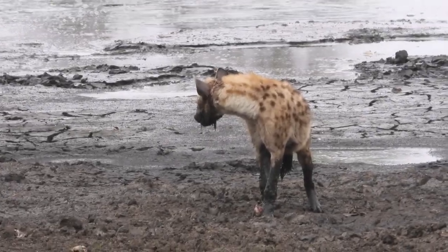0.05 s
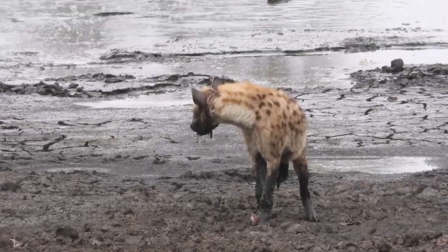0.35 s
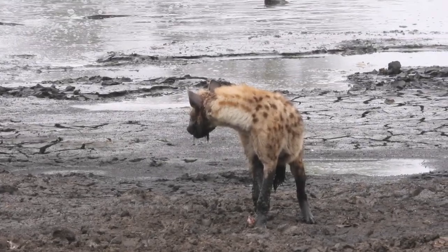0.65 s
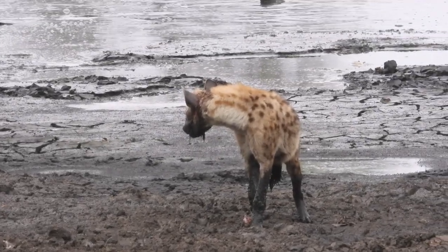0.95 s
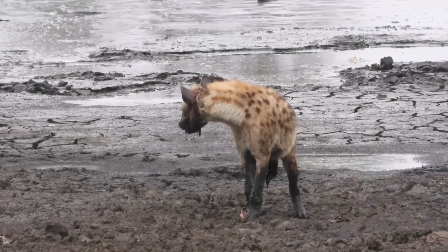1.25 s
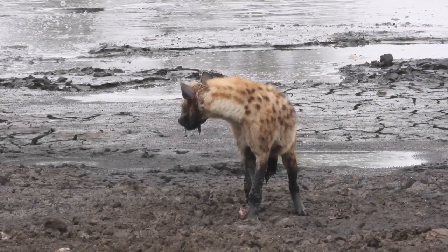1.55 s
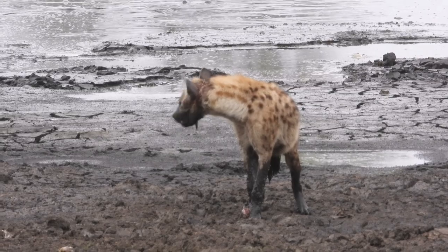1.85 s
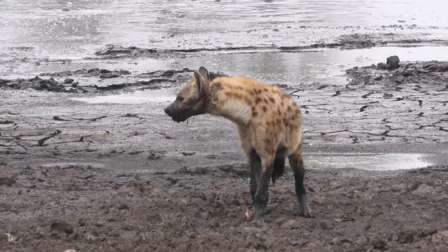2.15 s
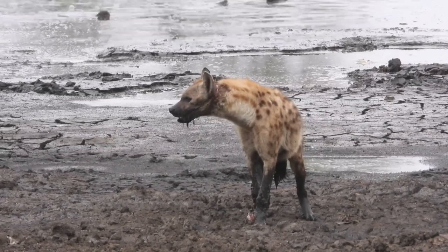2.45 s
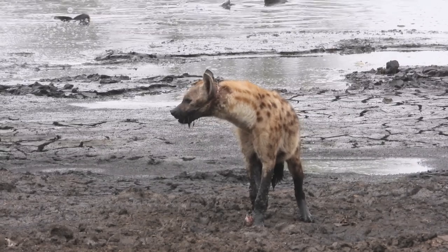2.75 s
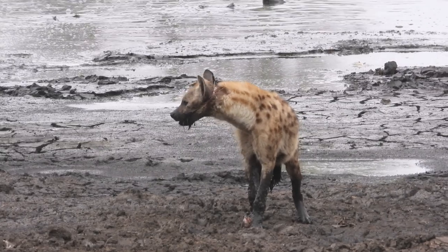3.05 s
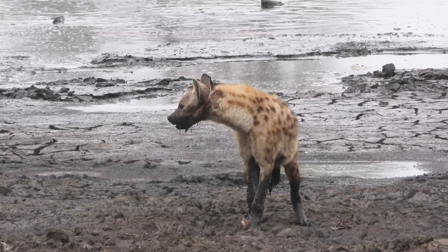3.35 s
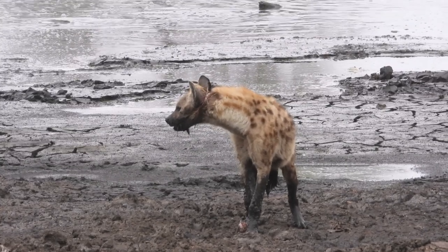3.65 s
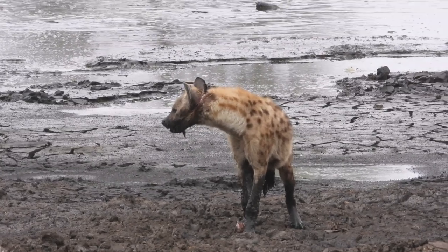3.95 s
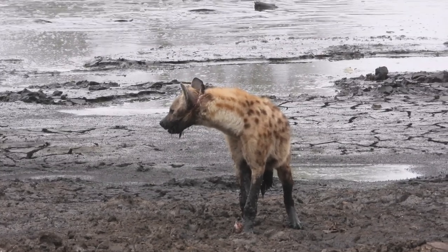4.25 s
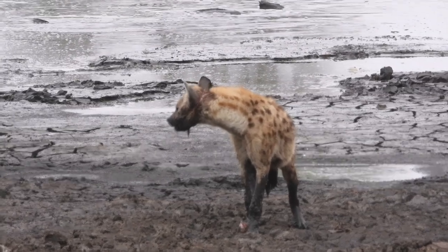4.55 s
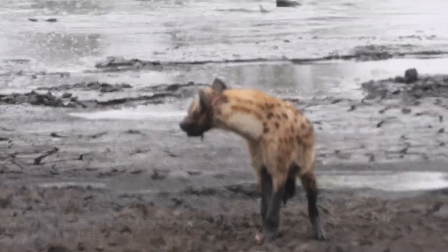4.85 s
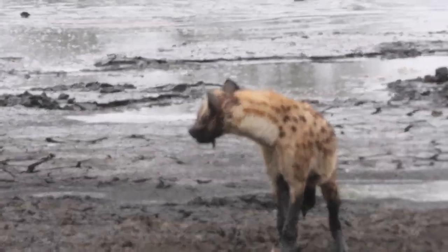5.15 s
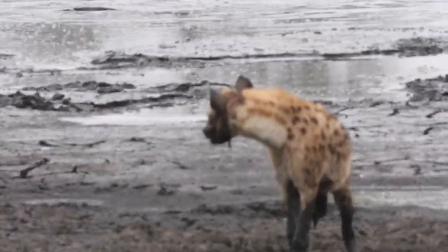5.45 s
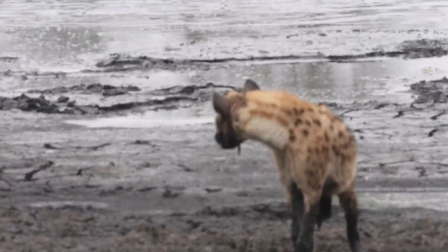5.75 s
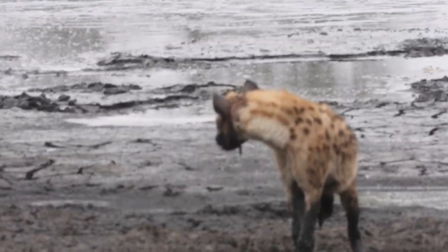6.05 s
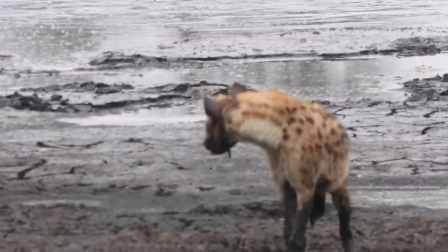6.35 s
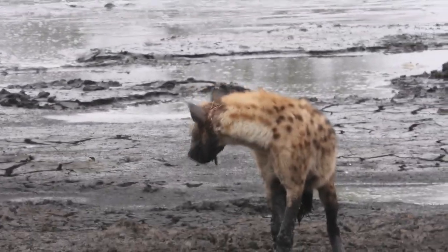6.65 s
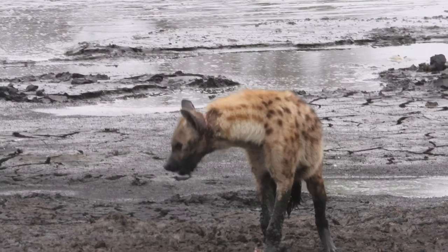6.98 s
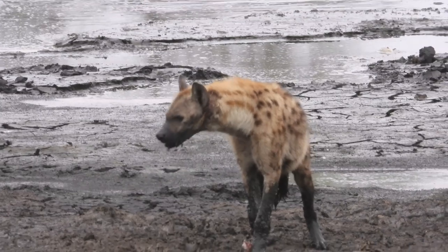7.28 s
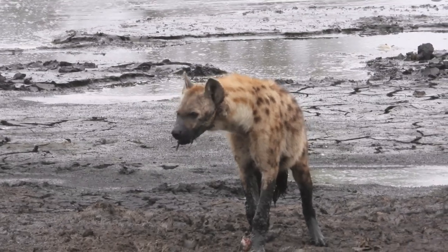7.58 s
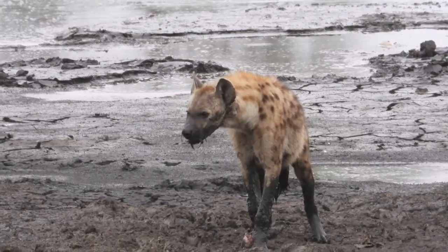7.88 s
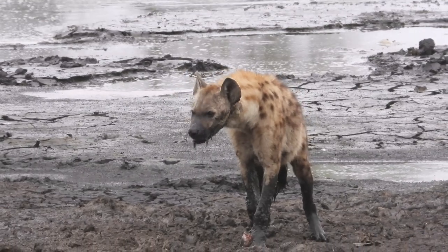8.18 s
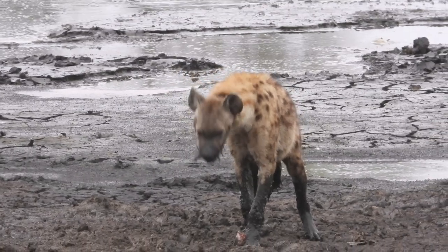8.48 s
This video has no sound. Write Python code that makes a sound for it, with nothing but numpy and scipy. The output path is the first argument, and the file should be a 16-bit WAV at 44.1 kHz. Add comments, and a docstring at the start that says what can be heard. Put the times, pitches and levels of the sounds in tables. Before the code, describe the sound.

Shrill piping notes from a scolding bird speed up and swell, pause, then end with three pips, with soft bumps and hiss nearby.

```python
"""Short piping notes quicken, swell and ease off, then three last pips: a plover-like bird scolds
beside a waterhole. Each note is a rising glide that cracks into a held, arched whistle (its "top"),
and ground and bushes scatter it back. Close by, a camera's zoom motor whirrs for a moment and its
body is bumped, over faint open air and far birds."""
import sys
import numpy as np
from scipy import signal
from scipy.fft import rfft, irfft, next_fast_len
from scipy.io import wavfile
from scipy.ndimage import uniform_filter1d, map_coordinates

SR = 44100
rng = np.random.default_rng(int(sys.argv[2]) if len(sys.argv) > 2 else 0)


def bounce(signal):
    """Save signal as a 16-bit WAV file at the path given by the first command-line argument."""
    frames = np.transpose(np.atleast_2d(signal))
    limited = np.clip(frames, -1, 1)
    pcm = np.round(limited * 32767).astype(np.int16)
    wavfile.write(sys.argv[1], SR, pcm)


N = 384552
TIME = np.arange(N) / SR

# the rasp in the bird's voice: pitch_hz, relative_db
RASP_SPECTRUM = [(1200, -28), (2500, -10), (3500, -8.5), (5500, -4.5), (7000, -9.5), (9000, -15.5),
                 (12000, -27), (15000, -50.5)]


def undb(db):
    """Turn decibels into a gain."""
    return 10 ** (np.asarray(db) / 20)


def unit(x):
    """Scale a sound to an average (rms) size of 1."""
    return x / np.sqrt(np.mean(x ** 2))


def read_db(points, hz):
    """Look up a spectrum's level at a pitch."""
    f, db = np.transpose(points)
    return np.interp(np.log(hz + 1), np.log(f), db)


def read_curve(table, at):
    """Look up a value between the rows of a two-column table."""
    return np.interp(at, *np.transpose(table))


def noise(points, n):
    """Noise of size 1 with the given spectrum."""
    size = next_fast_len(n, real=True)
    gains = undb(read_db(points, np.fft.rfftfreq(size, 1 / SR)))
    return unit(irfft(rfft(rng.standard_normal(size)) * gains, size)[:n])


def resonance(hz, width, n):
    """Noise of size 1 ringing around one pitch."""
    return unit(signal.lfilter(*signal.iirpeak(hz, hz / width, fs=SR), rng.standard_normal(n)))


def walk(rate, n):
    """A smooth random wobble of size near 1."""
    k = max(int(SR / rate), 2)
    jumps = np.repeat(rng.standard_normal(n // k + 1), k)
    return 1.967 * uniform_filter1d(uniform_filter1d(jumps, k), k)[:n]


def step(t, at, width):
    """A smooth switch from 0 to 1."""
    return .5 + .5 * np.tanh((t - at) / width)


def bump(t, at, width):
    """A smooth swell of height 1 around a moment."""
    return np.exp(-((t - at) / width) ** 2)


def phase_of(hz):
    """The running angle of a wave whose pitch changes."""
    return 2 * np.pi * np.cumsum(hz) / SR


def add(out, x, at, pan_db=0):
    """Mix a sound in at a time; pan_db is left minus right."""
    i = int(at * SR)
    x = x[..., :N - i]
    out[:, i:i + x.shape[-1]] += x * undb(np.array([[pan_db], [-pan_db]]) / 2)


def patchy(x, depth_db, size=2048):
    """Let each narrow band of pitch swell and fade on its own."""
    bands = signal.stft(x, nperseg=size)[2]
    swell = uniform_filter1d(rng.standard_normal(bands.shape[1:]), size=4, axis=0)
    swell = unit(uniform_filter1d(swell, size=4, axis=1))
    return signal.istft(bands * undb(depth_db * swell), nperseg=size)[1][:, :N]


def open_air(air_db=-61.5, hiss_db=4.5, drift_share=0.44, flicker_db=2, wide_hz=2200):
    """A distant din that swells in patches, alike at both ears in the bass, under smooth hiss."""
    # the air's noise: pitch_hz, relative_db
    spectrum = [(15, -100), (25, -44), (147, -11), (193, -5), (300, -3.5), (430, -2.5), (560, -8),
                (824, -4), (1230, -9), (2060, -10), (2700, -18.5), (3600, -16.5), (12100, -38.5),
                (15400, -66)]
    # the background's level over time, swelling near 1.2 s and dipping near 2.7 s; only drift_share of it is
    # used: time_s, relative_db
    loudness = [(0.0, -57.5), (1.2, -54), (2.7, -63.5), (5.3, -55.5), (7.8, -58.5)]
    # faint hums in the din: pitch_hz, width_hz, level_db
    hum_bands = [(185.3, 28, -71.5), (821, 26, -69), (2077, 36, -71.5)]
    times, levels = np.transpose(loudness)
    swell_db = drift_share * np.interp(TIME, times, levels - np.median(levels))
    spread = np.clip(np.sqrt(np.fft.rfftfreq(N, 1 / SR) / wide_hz), .4, 1)
    middle = noise(spectrum, N)
    side = irfft(rfft(noise(spectrum, N)) * spread, N)
    air = undb(air_db) * (middle + side * np.array([[1], [-1]]))
    low = signal.sosfiltfilt(signal.butter(2, 2500, fs=SR, output="sos"), air)
    hums = sum(undb(db + flicker_db * walk(12, N)) * resonance(hz, width, N)
               for hz, width, db in hum_bands)
    hums = signal.sosfilt(signal.butter(2, [140, 3000], "bandpass", fs=SR, output="sos"), hums)
    return undb(hiss_db) * (air - low) + undb(swell_db) * patchy(low + hums, depth_db=2.8)


def slur(length, from_hz, to_hz, flutter_db, waver=0.028):
    """One thin sliding call, blurred by distance."""
    n = int(length * SR)
    hz = np.linspace(from_hz, to_hz, n) * (1 + waver * walk(500, n))
    tone = unit(np.sin(phase_of(hz)) * signal.windows.tukey(n, .5))
    return undb(flutter_db * walk(122, n)) * tone


def far_birds(trill_start_s=7.72, trill_gap_s=.018):
    """Lone far calls, then a trill of falling ticks that swell into one longer slur."""
    # whistles and low hoots: start_s, length_s, from_hz, to_hz, level_db
    calls = [(.165, .13, 2900, 2420, -60), (.37, .1, 2340, 2260, -66), (.575, .13, 3060, 2830, -66),
             (8.0, .09, 3050, 2800, -71), (.06, .16, 178, 182, -64), (1.16, .07, 698, 720, -61)]
    out = np.zeros((2, N))
    for start, length, from_hz, to_hz, db in calls:
        add(out, undb(db) * slur(length, from_hz, to_hz, flutter_db=3.5), start)
    for k, length in enumerate([.0099] * 4 + [.0325]):
        tick = slur(length, from_hz=5000, to_hz=4370, flutter_db=-1)
        add(out, undb(-67.5 + 2 * k) * tick, trill_start_s + k * trill_gap_s)
    return out


def zoom_motor(on_s=4.8, off_s=5.545, whirr_db=-53.5, ticks_per_s=45, tick_s=0.0031, throb_db=4):
    """Gears whirr with small uneven ticks inside a housing that rings and throbs."""
    # gear noise: pitch_hz, relative_db
    gears = [(170, -21), (350, -1), (600, -7), (1700, -1), (2800, -4), (4500, -4), (7000, -12), (9500, -16),
             (12500, -17.5), (13500, -56)]
    # the housing's rings: pitch_hz, width_hz, level_db
    housing = [(423, 28, -63.5), (1614, 29, -59)]
    running = step(TIME, on_s, 0.009) * (1 - step(TIME, off_s, 0.01))
    kicks = (rng.random(N) < ticks_per_s / SR) * rng.exponential(size=N)
    ticks = signal.lfilter([1], [1, -np.exp(-1 / (tick_s * SR))], kicks)
    shared = noise(gears, N)
    each_ear = undb(-3) * np.array([noise(gears, N) for _ in range(2)])
    whirr = undb(whirr_db) * (1 + 0.46 * ticks) * (shared + each_ear)
    rings = sum(undb(db + throb_db * walk(25.06, N)) * resonance(hz, width, N)
                for hz, width, db in housing)
    return running * undb(.5 * walk(59, N)) * (whirr + rings)


def handling(damping=0.05, soft_hz=1900):
    """Bumps shake the camera body a few times; knocks are part dull scuff, part brief ring."""
    # soft bumps: start_s, pitch_hz, length_s, level_db, pan_db
    bump_list = [(6.118, 137, 0.026, -55, 31), (6.151, 200, 0.016, -40, 27)]
    # knocks before dulling: start_s, level_db, pitch_hz, fade_s (to fall 60 dB), pan_db, ring_share
    knock_list = [(4.495, -40, 428, 0.12, -3, 0.4), (4.8, -38, 316, 0.073, -3, 0.7),
                  (5.497, -40, 362, 0.14, -7, 1), (5.528, -35, 810, 0.088, -6, 0.85),
                  (6.924, -43, 765, 0.25, 5, 0.9), (6.945, -38.5, 370, 0.088, 4, 0)]
    bumps, knocks = np.zeros((2, 2, N))
    for start, hz, length, db, pan_db in bump_list:
        t = np.arange(int(length * SR)) / SR
        shake = -np.cos(2 * np.pi * hz * (t - length / 2))
        add(bumps, undb(db) * np.hanning(len(t)) * shake, start, pan_db)
    t = np.arange(SR // 4) / SR
    dull = signal.butter(2, [200, soft_hz], "bandpass", fs=SR, output="sos")
    for start, db, hz, fade_s, pan_db, ring in knock_list:
        scuff = unit(signal.sosfilt(dull, rng.standard_normal(len(t))))
        body = np.sqrt(ring) * resonance(hz, hz * damping, len(t)) + np.sqrt(1 - ring) * scuff
        add(knocks, undb(db - 60 * t / fade_s) * step(t, 0.0017, 0.0054) * body, start, pan_db)
    return bumps + signal.sosfilt(dull, knocks)


def with_echoes(x, ground_db=-21, near_db=-17, bushes_db=-33, dull_hz=7500, blur_s=.00002):
    """A note plus quick echoes from the ground and nearby, and a thin tail from the bushes."""
    t = np.arange(SR // 2) / SR
    ears = []
    for _ in range(2):
        ground, near, bushes = (
            rng.standard_normal(len(t)) * undb(-60 * t / fade_s) * step(t, delay_s, delay_s / 4)
            for fade_s, delay_s in ((.26, .001), (.15, .006), (1, .02)))
        bushes = signal.lfilter(*signal.butter(2, dull_hz, fs=SR), bushes)
        scatter = undb(ground_db) * unit(ground) + undb(near_db) * unit(near)
        scatter += undb(bushes_db) * unit(bushes)
        echoes = signal.fftconvolve(x, scatter / np.sqrt(len(t)))
        n = len(echoes)
        blurred = map_coordinates(echoes, [np.arange(n) + blur_s * SR * walk(400, n)])
        ears.append(blurred * undb(1.5 * walk(70, n)) + np.pad(x, (0, len(t) - 1)))
    return np.array(ears)


def harmonic(phase, shape, db, length, flutter_db):
    """One fluttering tone of the voice, at a given average level over its length."""
    shape = shape * undb(flutter_db * walk(500, len(phase)))
    return undb(db) * np.sin(phase) * shape * np.sqrt(2 * length * SR / np.sum(shape ** 2))


def lead_in(t, note, thread_db=-9):
    """The voice catches faintly before a note: a blip, then a thread of tone into the glide."""
    _, glide_s, from_hz, *_ = note
    hz = np.interp(t, [-.011, -.005], [2850, 2 * from_hz]) * (1 + .04 * walk(900, len(t)))
    thread = undb(thread_db) * step(t, -.009, .001) * (1 - step(t, 0, .001))
    level_db = -42 - 150 * glide_s + 2 * rng.standard_normal()
    return undb(level_db) * (bump(t, -.009, .0018) + thread) * np.sin(phase_of(hz))


def glide(t, note, beak_opens_s=.0094, grate_hz=290, throat_hz=5200, throat_width_hz=480):
    """A scratch, a catch as the beak opens, then a grating rise that rings in the throat."""
    # more urgent notes glide longer and wider: glide_s, end_pitch_share (of top_hz)
    urgency = [(.02, 0.776), (.026, .875), (.05, .865)]
    # the weaker harmonics: pitch_hz, relative_db
    overtones = [(1500, -21), (2000, -14.5), (5900, -2.5), (7000, -13.5), (7800, -11.5), (8600, -16),
                 (9400, -31), (12500, -39), (15000, -56)]
    _, length, from_hz, top_hz, second_db, third_db, *_, crest, rough = note
    n, strongest_db = len(t), max(second_db, third_db)
    rise = np.clip(t / length, 0, 1)
    hz = from_hz + (read_curve(urgency, length) * top_hz - from_hz) * rise ** .76
    grate = np.sin(phase_of(grate_hz * (1 + .35 * walk(300, n)))) * (.4 + rise)
    phase = phase_of(hz * (1 + .005 * walk(1100, n) + .008 * grate))
    gate = step(t, 0, .0008) * (1 - step(t, length, .001))
    catch = 1 - .6 * rng.random() * bump(t, beak_opens_s - .002, .002)
    falter = 1 - .55 * bump(t, length, .005)
    shape = gate * catch * falter * (1 + .25 * grate)
    beak = .06 + .94 * step(t, beak_opens_s, .0006)
    swell = undb(-24 * (rise - crest) ** 2 + 1.8 * walk(170, n))
    tone = harmonic(2 * phase, shape * swell, second_db, length, flutter_db=1.2)
    throat = 1 / (1 + ((3 * hz - throat_hz) / throat_width_hz) ** 2)
    third_shape = shape * beak * throat * undb(1.8 * walk(170, n))
    tone += harmonic(3 * phase, third_shape, third_db, length, flutter_db=1.2)
    for k in (1, 4, 5, 6, 7):
        colour = undb(read_db(overtones, k * hz)) * (beak if k > 1 else .5 + rough)
        tone += colour * harmonic(k * phase, shape, strongest_db, length, flutter_db=2.4)
    rasp = undb(strongest_db - 17) * gate * np.sqrt(beak) * (1 + bump(t, length - .003, .004))
    scratch = undb(second_db - 14) * bump(t, .0015, .002) * (.5 + rough) / 2
    return tone + noise(RASP_SPECTRUM, n) * (rasp + scratch)


def held_top(t, note, droop=0.0369, sag=0.0694, fade_db=3, stumble_gap_s=.01):
    """The voice jumps to an arched whistle; rough notes stumble and beat against a lower voice."""
    # how long the top is held: time_s, length_s
    holds = [(.2, 0.045), (2.7, 0.034), (3.2, 0.041), (4.7, 0.039), (6.9, 0.03)]
    # the falling flick that closes a note: time_s, relative_db
    flick_levels = [(.2, -12), (.5, -2), (1.9, -4), (2.2, -18), (5.4, -20), (5.7, -8), (7.5, -12)]
    start, glide_s, _, top_hz, _, _, first_db, second_db, third_db, _, rough = note
    t, n = t - glide_s, len(t)
    length = read_curve(holds, start)
    held = np.clip(t / length, 0, 1.1)
    flick_s = length * (.71 + .025 * rng.standard_normal())
    stumble = min(1.8 * rough, 1) * bump(t, flick_s, .0018)
    for k in (1, 2):
        stumble += rough ** (2 * k) * rng.uniform(.4, 1) * bump(t, flick_s - k * stumble_gap_s, .0016)
    arch = 1.006 - droop * ((held - .38) / .62) ** 2
    jitter = (.001 + .004 * rough ** 2) * walk(1100, n)
    phase = phase_of(top_hz * arch * (1 + jitter - sag * stumble))
    gate = step(t, 0, .0009) * (1 - step(t, length - .002, .003))
    shape = gate * undb(-fade_db * held ** 2) * (1 - .8 * stumble)
    levels = [second_db, third_db, third_db - 13, third_db - 25, third_db - 38]
    tone = sum(harmonic(k * phase, shape, db, length, .25 + rough ** 3)
               for k, db in enumerate(levels, 2))
    # the lowest harmonic starts before the jump and dies away first
    body = step(t, -.0066, .003) * np.exp(-np.maximum(t, 0) / .018) * (1 - step(t, length, .003))
    tone += harmonic(phase, body, first_db, length, 1 + rough)
    lower_hz = top_hz * (1.72 + .19 * walk(450, n))  # just under the second harmonic
    lower = undb(-9 + 4 * walk(250, n)) * rough ** 2 * np.sin(phase_of(lower_hz))
    flick_hz = top_hz * (1.3 + .2 * (1 - step(t, flick_s, .002)) + .03 * walk(700, n))
    flick_shape = undb(read_curve(flick_levels, start)) * bump(t, flick_s + .002, .003)
    flick = flick_shape * np.sqrt(2) * np.sin(phase_of(flick_hz))
    rasp = noise(RASP_SPECTRUM, n) * (undb(-33) + undb(-16) * (rough ** 3 + stumble))
    return tone + undb(max(second_db, third_db)) * (gate * (lower + rasp) + flick)


def scolding_bird():
    """The bird shifts, so each note has its own echoes and reaches the two ears a hair apart."""
    # the notes: start_s, glide_s, from_hz, top_hz, glide_second_db, glide_third_db, top_first_db,
    # top_second_db, top_third_db, crest_share, roughness (0-1). The levels are those of harmonics
    # (multiples of the pitch); the crest is where in the glide the second one peaks.
    notes = [(0.238, 0.012, 1480, 2146, -56, -57, -53.5, -43, -43.5, 0.0, 0.84),
             (0.516, 0.013, 1650, 2156, -56, -58.5, -52, -45.5, -46.5, 0.18, 1),
             (0.773, 0.016, 1645, 2150, -42, -44.5, -53, -38, -47, 0.45, 0.98),
             (1.078, 0.019, 1684, 2170, -39.5, -40, -52, -36.0, -43.5, 0.15, 0.77),
             (1.353, 0.017, 1690, 2190, -42.5, -39.5, -56, -33, -40.5, 0.0, 0.75),
             (1.616, 0.019, 1680, 2219, -43.5, -37.5, -51.5, -33, -39.5, 0.3, 0.87),
             (1.9166, 0.0255, 1565, 2204, -42, -36, -51.5, -38.5, -35, 0.4, 0.8),
             (2.184, 0.024, 1615, 2202, -44.5, -33.5, -51, -32.5, -35.5, 0.19, 0.52),
             (2.439, 0.026, 1640, 2211, -43, -32, -48, -25, -34, 0.93, 0.12),
             (2.683, 0.029, 1613, 2164, -41, -32.5, -45, -26, -35.5, 0.47, 0.44),
             (2.896, 0.044, 1530, 2145, -35, -38, -49.5, -27.5, -31, 0.41, 0.45),
             (3.083, 0.049, 1558, 2196, -30, -30, -57.5, -39.5, -33.5, 0.39, 0.038),
             (3.278, 0.055, 1490, 2159, -32.5, -29, -47.5, -27.0, -28.5, 0.004, 0.089),
             (3.471, 0.058, 1456, 2162, -35, -33.5, -44.5, -26.0, -31, 0.046, 0.046),
             (3.686, 0.06, 1374, 2114, -35.5, -33, -47, -31, -37, 0.58, 0.3),
             (3.937, 0.046, 1415, 2113, -30.5, -31, -42.5, -41, -29, 0.59, 0.045),
             (4.166, 0.045, 1440, 2124, -30.5, -34.5, -47, -31.5, -30.5, 0.45, 0.045),
             (4.402, 0.038, 1464, 2134, -29, -30, -43, -29.0, -28, 0.48, 0.085),
             (4.635, 0.036, 1510, 2133, -29, -29, -38.5, -36, -27.0, 0.56, 0.12),
             (4.878, 0.035, 1567, 2126, -37.5, -34, -49, -26, -31.5, 0.61, 0.05),
             (5.133, 0.04, 1548, 2114, -29.5, -28.5, -55.0, -30.0, -30, 0.37, 0.34),
             (5.38, 0.034, 1486, 2094, -45, -28.5, -44, -32.5, -33.5, 0.23, 0.57),
             (5.659, 0.032, 1545, 2110, -36.5, -38.0, -49, -35.5, -38.0, 0.38, 0.62),
             (6.879, 0.022, 1717, 2020, -37.0, -39, -52.5, -38, -43, 0.35, 0.98),
             (7.204, 0.021, 1740, 2060, -37.5, -42.5, -47, -33.5, -39, 0.075, 0.87),
             (7.483, 0.021, 1637, 2119, -35, -38, -46, -32.5, -36.0, 0, 0.6)]
    # left minus right: time_s, pan_db
    balance = [(1.35, 4.3), (1.65, 1.5), (2.6, 4.5), (3.1, 2.3), (4.5, 1), (5.4, 2.8), (6.9, 1.8),
               (7.5, -4)]
    # how late the right ear hears the bird: time_s, lag_samples
    lags = [(0.2, 1.57), (2.65, 1.04), (5.4, 0.71), (6.9, -1.06)]
    out = np.zeros((2, N))
    t = np.arange(-.016, .125, 1 / SR)
    for note in notes:
        start = note[0]
        voice = lead_in(t, note) + glide(t, note) + held_top(t, note)
        add(out, with_echoes(voice), start + t[0], read_curve(balance, start))
    right = map_coordinates(out[1], [np.arange(N) - read_curve(lags, TIME)], order=3)
    return np.array([out[0], right])


def scene(bird_db=0.32):
    """The bird, far calls, the camera's own noises and the open air."""
    return undb(bird_db) * scolding_bird() + far_birds() + handling() + zoom_motor() + open_air()


def record(dry, top_hz=14800):
    """The camera cuts off the highest treble."""
    return signal.sosfilt(signal.ellip(8, .2, 70, top_hz, fs=SR, output="sos"), dry)


dry = scene()
out = record(dry)
bounce(out)
```